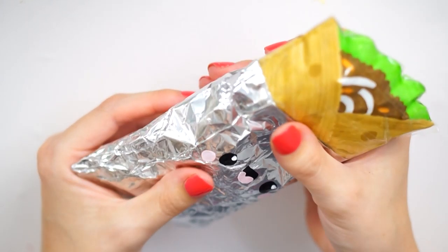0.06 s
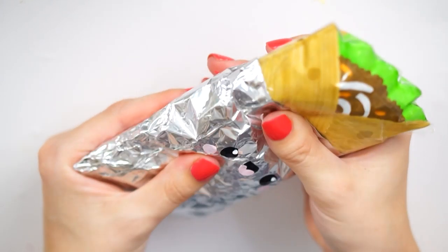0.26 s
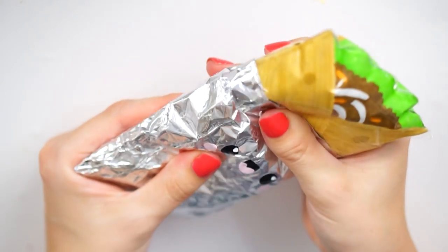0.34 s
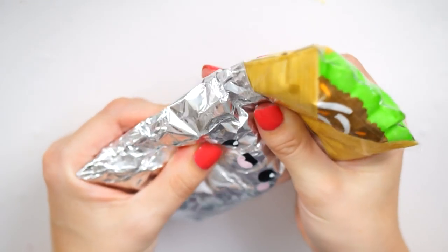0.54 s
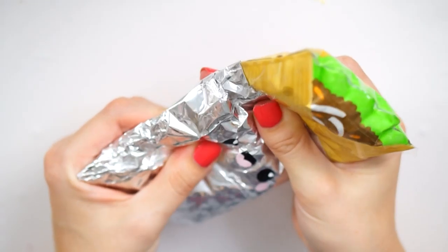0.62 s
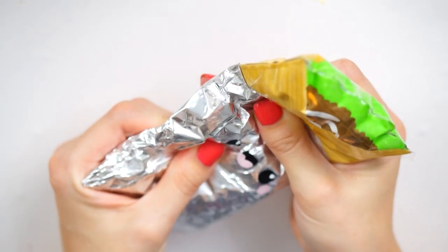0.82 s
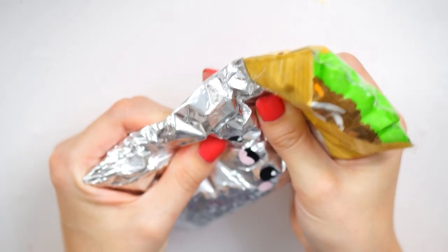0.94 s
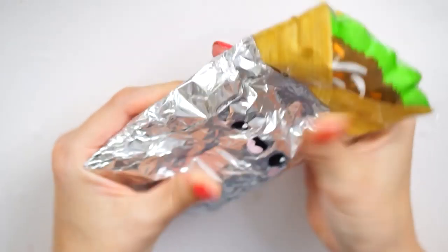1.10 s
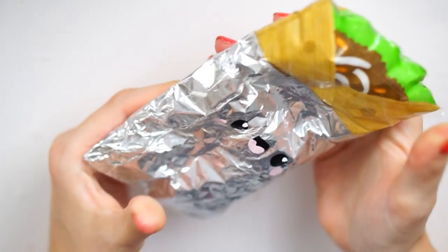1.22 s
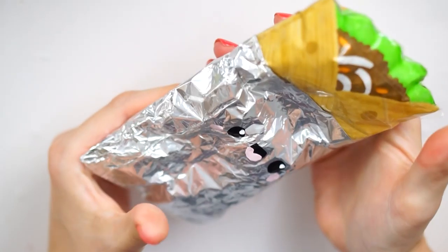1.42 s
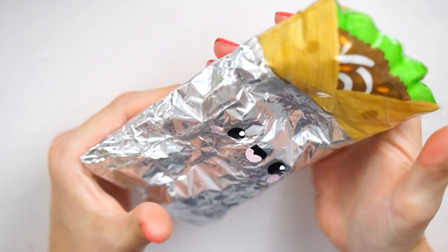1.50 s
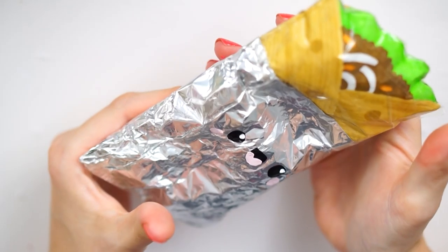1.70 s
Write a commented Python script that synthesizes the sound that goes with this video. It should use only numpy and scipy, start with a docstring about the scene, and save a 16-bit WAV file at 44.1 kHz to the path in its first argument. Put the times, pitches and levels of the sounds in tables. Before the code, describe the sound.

Foil wrapped around a stuffed paper toy crinkles in a squeezing hand grip, dense and snappy, eases off, bursts again on release, then ticks sparsely until a small dent pops; close stereo microphones, small room.

```python
"""A dense foil crackle with sharp single snaps, then a rest, a springing back and slow ticking; a dent pops out.
Place: a small room. Two hands squeeze and release a stuffed paper toy in foil, close to a microphone pair.
Snaps and crackle are very short noise bursts coloured as foil; dull knocks are bursts in a low, narrow band.
The dent is a fluttering, falling sine ping. A faint hollow ring, scattered echoes and steady hiss surround it."""
import sys
import numpy as np
from scipy import signal
from scipy.fft import rfft, irfft
from scipy.io import wavfile
from scipy.ndimage import uniform_filter1d

SR = 44100
rng = np.random.default_rng(int(sys.argv[2]) if len(sys.argv) > 2 else 0)


def inscribe(sig):
    """Save sig as 16-bit PCM at rate SR to the path in sys.argv[1].

    A 1-D sig is mono; a 2-D sig holds one channel per row.
    Samples are clipped to [-1, 1] before scaling.
    """
    pcm = np.round(np.clip(np.atleast_2d(sig).T, -1, 1) * 32767)
    wavfile.write(sys.argv[1], SR, pcm.astype(np.int16))


N = 77175  # samples

# steady room air and hiss: f/Hz, relative level/dB
AIR_COLOUR = [(30, -19.5), (150, -21), (600, -8.5), (1150, -3.5), (1440, 3.5), (1750, -1), (3000, -13),
              (16000, -19)]
AIR_DB = -58.5  # RMS per microphone

# faint modes of the hollow space round the toy: f/Hz, level/dB
HOLLOW_MODES = [(1240, -27), (1435, -21), (1643, -29), (1900, -51)]
HOLLOW_T60_S = 0.12
HOLLOW_AIR_DB = -1.5  # how strongly the room air wakes the hollow

# single creases snapping: t/s, body level/dB, bite level/dB, sparkle level/dB (before SNAP_TRIM_DB)
SNAP_EVENTS = [(0.013, -46.5, -63, -76), (0.0315, -55.5, -68, -69), (0.143, -51, -46.5, -46),
               (0.1752, -39.5, -50, -38.5), (0.2118, -35, -58, -33), (0.2363, -24.5, -35, -29),
               (0.2648, -29.5, -44, -24.5), (0.3062, -43, -53, -27.5), (0.3311, -53, -41, -23.5),
               (0.3445, -29, -41, -25.5), (0.3489, -30, -42, -32), (0.3595, -34, -30, -32),
               (0.3693, -28, -28.5, -40), (0.379, -28.5, -40, -45), (0.3862, -29, -24.5, -33),
               (0.4252, -50, -28, -27), (0.4509, -31, -31, -28), (0.478, -25.5, -37, -27),
               (0.5088, -30.5, -35, -24.5), (0.5108, -38, -26, -26), (0.5159, -37, -28.5, -18.5),
               (0.5197, -22.5, -33, -33), (0.5458, -42, -23, -23.5), (0.5858, -28.5, -25.5, -16.5),
               (0.6102, -26, -30, -21), (0.6283, -32.5, -34, -18.5), (0.6472, -33.5, -30, -23),
               (0.652, -35, -35, -22.5), (0.6568, -31.5, -36, -22.5), (0.6795, -28, -48, -39),
               (0.689, -38, -37, -38), (0.7194, -34, -32.5, -30), (0.7413, -29.5, -30.5, -42),
               (0.7558, -20.5, -29, -29), (0.7714, -35, -32, -45), (0.7892, -55, -44, -23.5),
               (0.8042, -46, -40, -24.5), (0.8154, -33.5, -35, -33), (0.8485, -47, -37, -32.5),
               (0.8662, -39, -37, -34), (0.8775, -54, -36, -37), (0.921, -40, -39, -56),
               (0.9355, -34, -43, -49), (0.9416, -47, -46, -26), (0.9478, -37, -30.5, -40),
               (0.9667, -45, -44, -49), (1.0213, -36.5, -34, -31.5), (1.042, -37.5, -41, -34),
               (1.0475, -46, -40, -32), (1.0689, -33, -35, -30), (1.079, -33, -31, -22),
               (1.1022, -20.5, -31, -31), (1.11, -27, -34, -25), (1.1327, -23, -40, -33),
               (1.1597, -21, -21, -19.5), (1.1866, -34.5, -44, -45), (1.2152, -30.5, -45, -44),
               (1.2252, -31.5, -41.5, -45), (1.2769, -49, -44, -44), (1.296, -47, -40, -28.5),
               (1.3495, -47, -60, -43), (1.404, -55, -52, -44), (1.4238, -47, -50, -47),
               (1.566, -50, -58, -49), (1.5943, -48, -51, -46), (1.648, -63, -49, -43),
               (1.731, -45, -43, -38)]
# colour of a buckling crease: f/Hz, level/dB
FOIL_COLOUR = [(60, -42), (200, -30), (350, -17.5), (500, -6), (800, -5.5), (1000, -1.24), (1400, 0.5),
               (2400, 0), (3400, -5), (5500, -2.5), (7000, -4), (8400, 1), (9600, -3.5), (11000, -1.5),
               (15500, -7)]
# the body sounds higher as the foil is pressed tight, lower as it slackens: t/s, centre f/Hz
BODY_CENTRE = [(0.14, 1430), (0.25, 2020), (0.37, 1470), (0.49, 2180), (0.76, 2080), (1.05, 1950),
               (1.225, 1370), (1.3, 1650)]
BODY_OCTAVES = 0.8  # bandwidth
BASS_TOP_HZ, BODY_TOP_HZ, BITE_TOP_HZ = 948, 2930, 7840
SNAP_TRIM_DB, SNAP_SPAN_S = -2.5, 0.0025  # table levels are RMS over this span
SNAP_DECAY_S, SNAP_CLICK = 0.00053, 1.38  # click height against noise of RMS one
# strong creases flip at once, weaker ones stutter for longer
CLEAN_SNAP_DB, SLUGGISH_S_PER_DB = -23, 0.00007

# decay of the room's tail: f/Hz, T60/s
TAIL_T60 = [(300, 0.34), (1300, 0.28), (16000, 0.22)]
# strength of the room's tail: f/Hz, level/dB
TAIL_LEVEL = [(300, -10), (1300, -3.5), (9000, -8.5), (16000, -5)]
EARLY_DB, EARLY_T60_S = -1.5, 0.093
# the microphones' echoes are alike in the bass, and keep a least likeness in the treble
LIKENESS_HZ, LIKENESS_LEAST = 1820, 0.36

# level of the dense crackle: t/s, bass level/dB, body level/dB, treble level/dB (before CRACKLE_TRIM_DB)
CRACKLE_LEVELS = [(0.135, -74, -66, -66.5), (0.15, -65.5, -50, -49), (0.202, -55, -50, -51),
                  (0.22, -47, -39, -37.5), (0.275, -50.5, -37.5, -33), (0.315, -41.5, -35, -34.5),
                  (0.344, -38.5, -33, -26.5), (0.383, -46, -37, -29.5), (0.436, -57, -41.5, -35),
                  (0.484, -47.5, -35, -26.5), (0.526, -44, -34.5, -30), (0.564, -55, -40, -32.5),
                  (0.61, -52.5, -36.5, -28.5), (0.655, -58, -43.5, -30.5), (0.74, -58, -46.5, -40),
                  (0.765, -60, -45, -38.5), (0.815, -60, -45, -41), (0.84, -64.5, -52.5, -44),
                  (0.93, -55, -52, -41), (1.01, -66, -54, -50.5), (1.066, -57, -42.5, -37.5),
                  (1.098, -45.5, -33.5, -28.5), (1.161, -41, -35.5, -27), (1.182, -45, -45, -41.5),
                  (1.23, -52, -60, -49), (1.26, -61, -59, -50), (1.42, -74, -57.5, -53),
                  (1.48, -74, -64.5, -53), (1.579, -67.5, -58, -50.5), (1.677, -77, -60, -48),
                  (1.715, -53, -47.5, -55.5), (1.745, -69, -58, -61.5)]
# small creases per second at full squeeze: bass, body, treble [1/s]
GRAIN_RATES = (830, 900, 2400)
THINNING = 0.5  # gentler squeezing buckles fewer creases: dB of rate per dB of treble level
GRAIN_SPREAD_DB, GRAIN_MAX_DB, GRAIN_COLOUR_DB = 3, 14, 3.5
GRAIN_DECAY_S = 0.00056
CRACKLE_TRIM_DB, EVEN_S = -3, 0.061  # EVEN_S: span over which the power is evened

# paper under the foil giving way: t/s, level/dB (before SNAP_TRIM_DB)
KNOCK_EVENTS = [(0.3135, -40), (0.3445, -54), (0.3785, -38), (0.4545, -36.5), (0.811, -44.5),
                (1.1605, -34.5)]
KNOCK_HZ = 524

# a dent popping out and fluttering: t/s, level/dB
POP_EVENTS = [(1.6835, -25), (1.6875, -39), (1.6936, -31), (1.697, -46), (1.6992, -47)]
POP_HZ, POP_RISE_S, POP_GLIDE = 1340, 0.00076, 0.028  # the falling pitch passes POP_HZ after two rises
POP_OVERTONE_HZ, POP_OVERTONE_DB = 5160, -10.5
POP_LOWEST_HZ = 420  # the ping carries no bass below this

# balance of the microphone pair: f/Hz, left minus right level/dB
PAIR_BALANCE = [(300, 0.3), (1300, -2.8), (4000, -4.5), (12000, -3.5)]
# phase by which the left microphone leads: f/Hz, phase/rad
PAIR_LEAD = [(100, 1), (400, 1.68), (1400, 1.415), (3500, 1.52), (7000, 0.71), (14000, 0.071)]
PATCH_PAN_DB = 2  # left minus right for the direct sound of an outermost patch
EDGE_HZ = 15900  # top of the recorder's band


def amp(db):
    """Amplitude of a level in dB."""
    return 10 ** (np.asarray(db) / 20)


def unit(x):
    """Scales to an energy of one."""
    return x / np.sqrt(np.sum(x ** 2, -1, keepdims=True) + 1e-20)


def read(points, hz):
    """Reads a table on a log-frequency axis."""
    f, value = np.transpose(points)
    return np.interp(np.log(hz + 1), np.log(f + 1), value)


def add(mix, s, sound):
    """Mixes a sound in at a time."""
    part = mix[round(s * SR):][:len(sound)]
    part += sound[:len(part)]


def colour(x, points, size=2048):
    """Causal minimum-phase filter with the given spectrum, made by folding its cepstrum."""
    cepstrum = irfft(np.log(amp(read(points, np.fft.rfftfreq(size, 1 / SR)))))
    cepstrum[1:size // 2] *= 2
    cepstrum[size // 2 + 1:] = 0
    response = irfft(np.exp(rfft(cepstrum)))
    return signal.fftconvolve(x, response)[:len(x)]


def split(x, edges_hz, order=3):
    """Splits a sound into bands, lowest first."""
    bands = []
    for hz in edges_hz:
        bands.append(signal.sosfilt(signal.butter(order, hz, fs=SR, output="sos"), x))
        x = signal.sosfilt(signal.butter(order, hz, "high", fs=SR, output="sos"), x)
    return bands + [x]


def air():
    """Quiet room air and hiss: coloured noise, independent in each microphone."""
    noise = rng.standard_normal((2, N))
    coloured = np.array([colour(z, AIR_COLOUR) for z in noise])
    return amp(AIR_DB) * np.sqrt(N) * unit(coloured)


def hollow(x):
    """The hollow space answers a sound with a few decaying modes."""
    t = np.arange(SR // 4) / SR
    decay = amp(-60 * t / HOLLOW_T60_S)
    ring = sum(amp(db) * unit(np.sin(2 * np.pi * hz * t) * decay) for hz, db in HOLLOW_MODES)
    return signal.fftconvolve(x, ring)[:N]


def buckle(decay_s, size=600):
    """One crease flips: a click, then a very short shiver of the sheet."""
    shiver = rng.standard_normal(size) * np.exp(-np.arange(size) / SR / decay_s)
    shiver[0] = SNAP_CLICK * rng.choice([-1, 1])
    return unit(colour(shiver, FOIL_COLOUR))


def body_of(x, hz):
    """The flexing patch of sheet favours one band."""
    edges = hz * 2 ** (BODY_OCTAVES * np.array([-.5, .5]))
    b, a = signal.butter(1, edges, "band", fs=SR)
    return unit(signal.lfilter(b, a, x))


def snaps(count):
    """Large creases flip, each on one patch of the sheet with its own brightness."""
    out = np.zeros((count, N))
    for k, (s, *levels_db) in enumerate(SNAP_EVENTS):
        weakness_db = max(CLEAN_SNAP_DB - max(levels_db), 0)
        crease = buckle(SNAP_DECAY_S + SLUGGISH_S_PER_DB * weakness_db)
        body, bite, sparkle = split(crease, [BODY_TOP_HZ, BITE_TOP_HZ])
        body = body_of(body, np.interp(s, *np.transpose(BODY_CENTRE)))
        bands = unit(np.array([body, bite, sparkle]))
        add(out[k % count], s, amp(levels_db) @ bands)
    return out * amp(SNAP_TRIM_DB) * np.sqrt(SNAP_SPAN_S * SR)


def echoes(size=256):
    """Scattered echoes for each microphone: quick ones off hands and table, then the room's tail."""
    shape = (2, SR // 2)
    taps = rng.standard_normal(shape) * (rng.random(shape) < .15)
    taps[:, :size // 4] = 0  # a gap after the direct sound
    hz, t, z = signal.stft(taps, SR, nperseg=size)
    hz = hz[:, None]
    likeness = 1 / np.sqrt(1 + (hz / LIKENESS_HZ) ** 4)
    likeness = np.clip(likeness, LIKENESS_LEAST, 1)
    z[1] = likeness * z[0] + np.sqrt(1 - likeness ** 2) * z[1]
    early = amp(EARLY_DB) * unit(amp(-60 * t / EARLY_T60_S))
    late = amp(read(TAIL_LEVEL, hz)) * unit(amp(-60 * t / read(TAIL_T60, hz)))
    z *= np.hypot(early, late) * np.sqrt(len(t) / np.sum(taps[0] ** 2))
    return signal.istft(z, SR, nperseg=size)[1]


def crackle(count, kinds=60, order=9):
    """Small creases of many colours buckle at random; all glint, fewer have body and fewer still bass."""
    time = np.arange(N) / SR
    times, *levels_db = np.transpose(CRACKLE_LEVELS)
    treble_db = levels_db[-1]
    effort_db = np.interp(time, times, treble_db - treble_db.max())
    rates = np.outer(GRAIN_RATES, amp(THINNING * effort_db))
    grains = np.zeros((len(GRAIN_RATES), count, N))
    for k in range(kinds):
        tint_hz = np.geomspace(FOIL_COLOUR[2][0], EDGE_HZ, order)
        tint = np.c_[tint_hz, GRAIN_COLOUR_DB * rng.standard_normal(order)]
        sizes_db = np.minimum(GRAIN_SPREAD_DB * rng.exponential(1, N), GRAIN_MAX_DB)
        sizes = amp(sizes_db) * rng.choice([-1, 1], N)
        # one draw serves all bands, so every bass grain also has body and treble
        trains = sizes * (rng.random(N) < rates / kinds / SR)
        grain = unit(colour(buckle(GRAIN_DECAY_S), tint))
        grains[:, k % count] += signal.oaconvolve(trains, grain[None], axes=1)[:, :N]
    out, span = np.zeros((count, N)), round(EVEN_S * SR)
    for k, level_db in enumerate(levels_db):
        band = split(grains[k], [BASS_TOP_HZ, BODY_TOP_HZ])[k]
        power = uniform_filter1d((band ** 2).sum(0), span)
        power = uniform_filter1d(power, span)
        evened = band / np.sqrt(abs(power) + 1e-12)
        out += evened * amp(np.interp(time, times, level_db))
    return out * amp(CRACKLE_TRIM_DB)


def knocks(count):
    """The paper under the foil gives way with a dull knock: a buckle heard through a low band."""
    out = np.zeros((count, N))
    for k, (s, level_db) in enumerate(KNOCK_EVENTS):
        add(out[k % count], s, amp(level_db) * body_of(buckle(SNAP_DECAY_S), KNOCK_HZ))
    return out * amp(SNAP_TRIM_DB) * np.sqrt(SNAP_SPAN_S * SR)


def dent():
    """A foil panel pops out with a short ping and flutters, each time ringing for a few falling cycles."""
    out, t = np.zeros(N), np.arange(0, 10 * POP_RISE_S, 1 / SR)
    u = t / POP_RISE_S
    swell = (u * np.exp(1 - u)) ** 2
    pitch_hz = POP_HZ * (1 + POP_GLIDE * (1 - u / 2))
    ring = swell * np.sin(2 * np.pi * np.cumsum(pitch_hz) / SR)
    for s, level_db in POP_EVENTS:
        add(out, s, amp(level_db) * ring)
    # only the first pop has the overtone
    s, level_db = POP_EVENTS[0]
    overtone = swell * np.sin(2 * np.pi * POP_OVERTONE_HZ * t)
    add(out, s, amp(level_db + POP_OVERTONE_DB) * overtone)
    return split(out, [POP_LOWEST_HZ])[1]


def scene(count=10):
    """Each patch of foil reaches two close microphones by its own direct path and echoes."""
    floor = air()
    patches = snaps(count) + crackle(count) + knocks(count)
    patches[0] += dent()
    side = np.array([[.5], [-.5]])  # left, right
    heard = np.zeros((2, N)) + hollow(patches.sum(0) + amp(HOLLOW_AIR_DB) * floor[0])
    for patch, place in zip(patches, np.linspace(-1, 1, count)):
        direct = patch * amp(side * place * PATCH_PAN_DB)
        reflected = signal.fftconvolve(patch[None], echoes(), axes=1)[:, :N]
        heard += direct + reflected
    hz = np.fft.rfftfreq(2 * N, 1 / SR)
    pair = amp(side * read(PAIR_BALANCE, hz)) * np.exp(1j * side * read(PAIR_LEAD, hz))
    return irfft(rfft(heard, 2 * N) * pair)[:, :N] + floor


def record(dry):
    """The recorder's band limit: a steep low-pass."""
    lowpass = signal.firwin(511, EDGE_HZ, window=("kaiser", 9), fs=SR)
    return signal.oaconvolve(dry, lowpass[None], "same")


dry = scene()
out = record(dry)
inscribe(out)
```